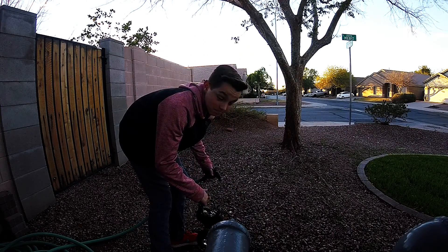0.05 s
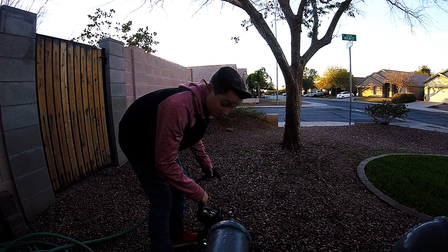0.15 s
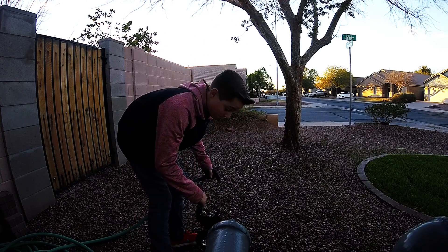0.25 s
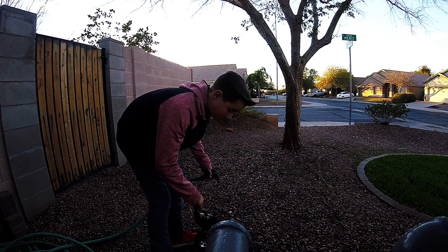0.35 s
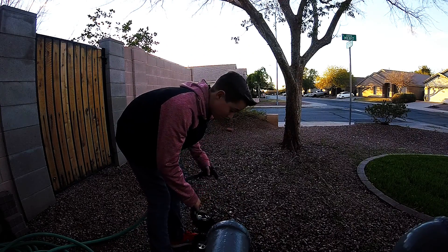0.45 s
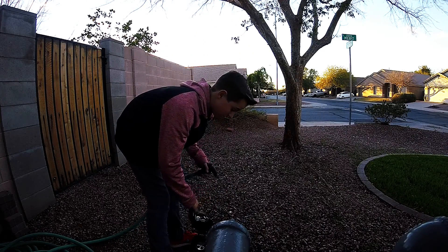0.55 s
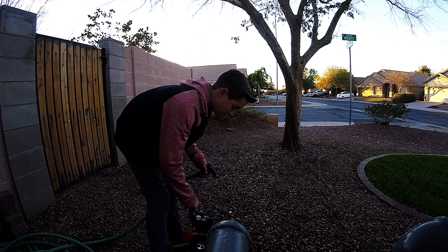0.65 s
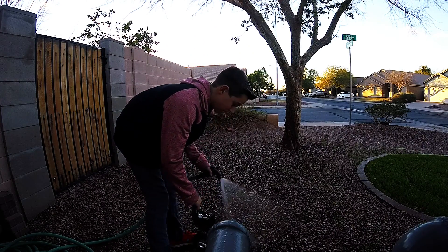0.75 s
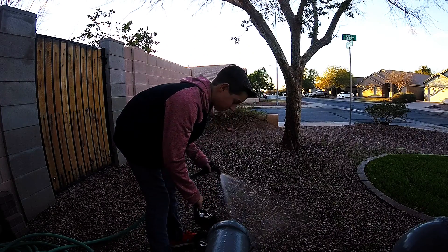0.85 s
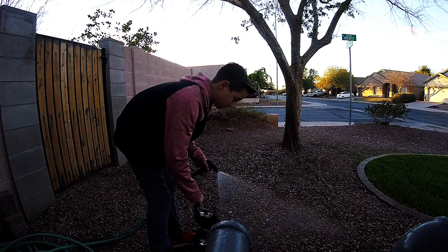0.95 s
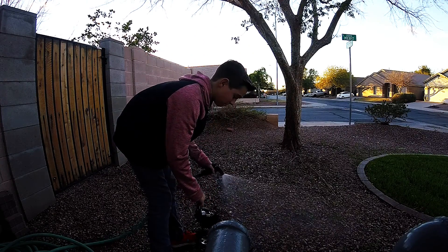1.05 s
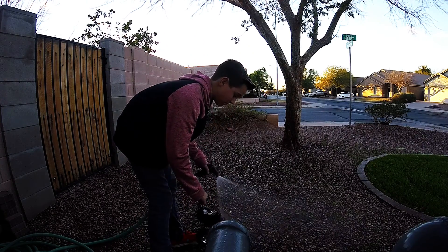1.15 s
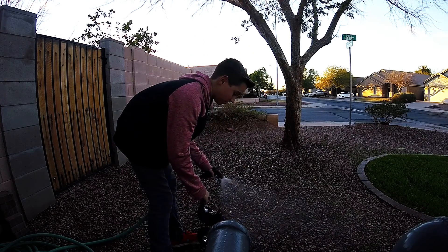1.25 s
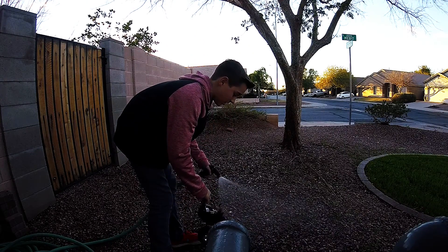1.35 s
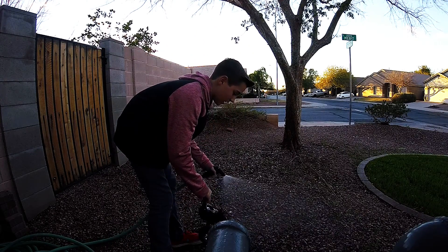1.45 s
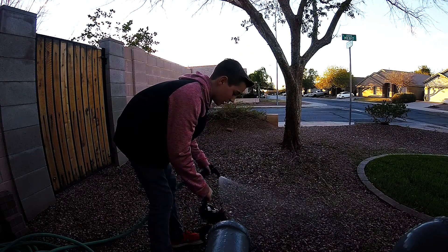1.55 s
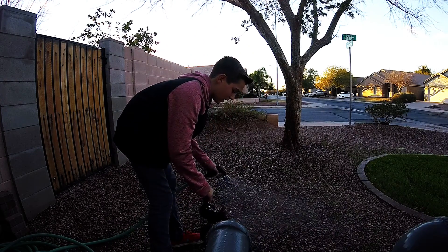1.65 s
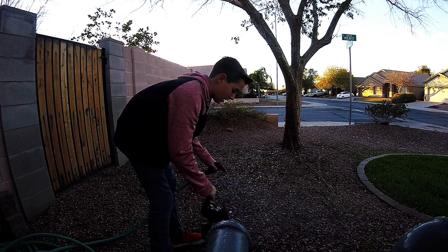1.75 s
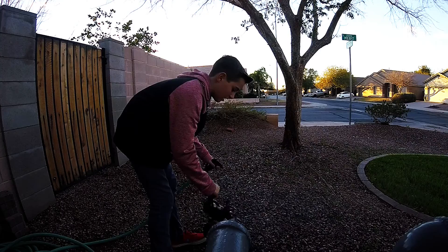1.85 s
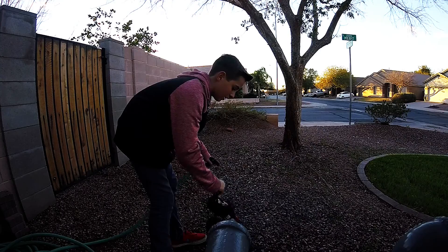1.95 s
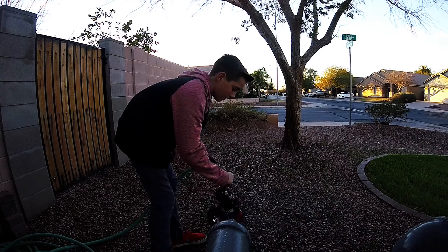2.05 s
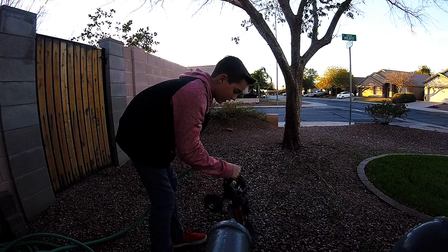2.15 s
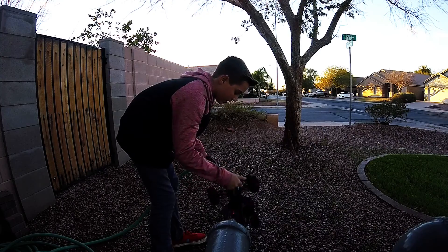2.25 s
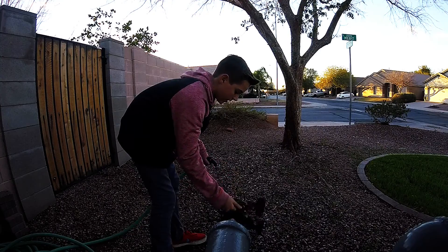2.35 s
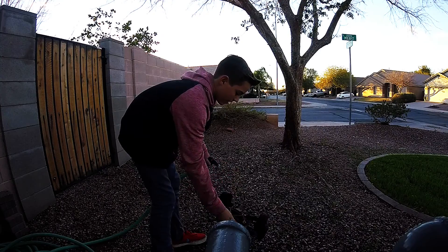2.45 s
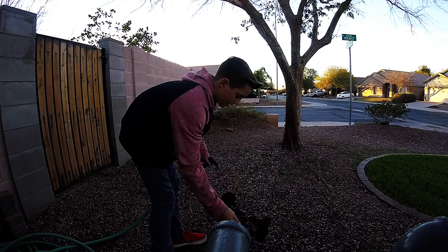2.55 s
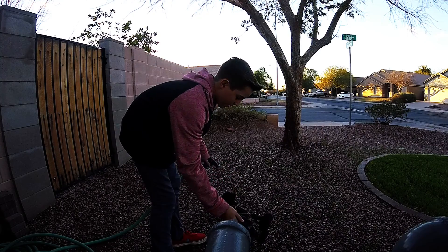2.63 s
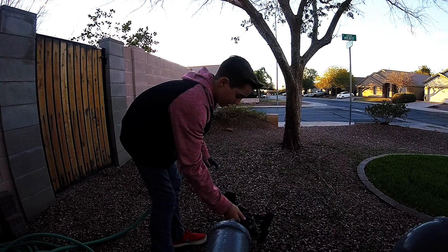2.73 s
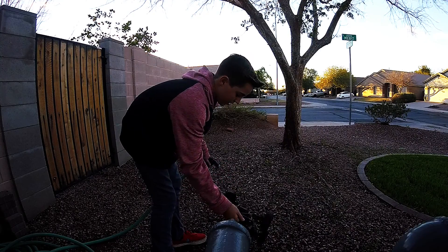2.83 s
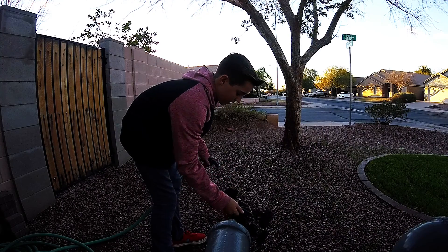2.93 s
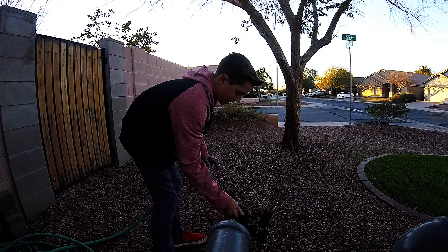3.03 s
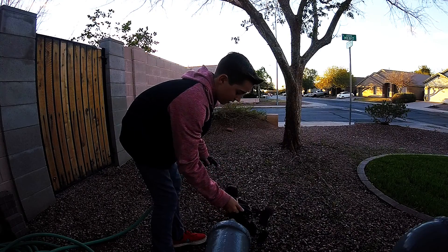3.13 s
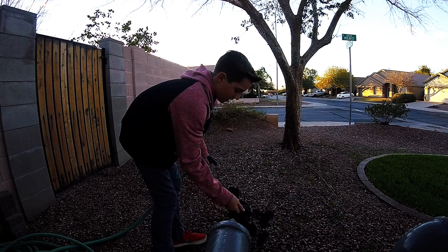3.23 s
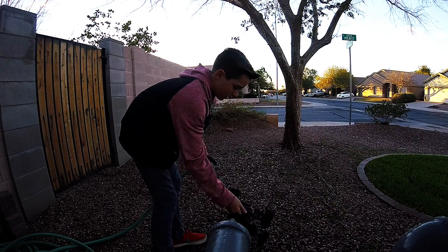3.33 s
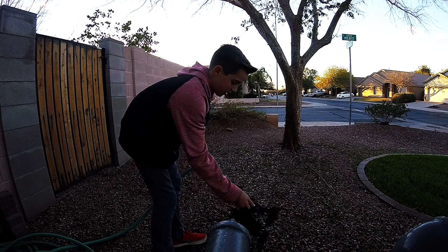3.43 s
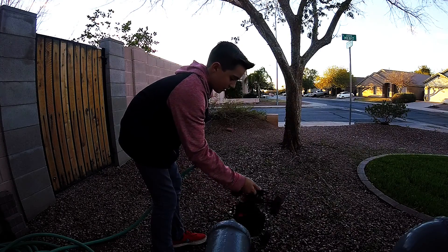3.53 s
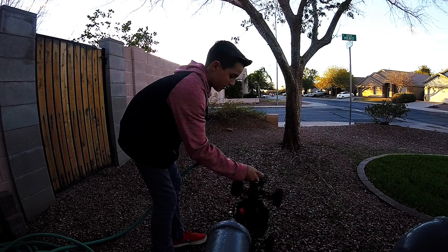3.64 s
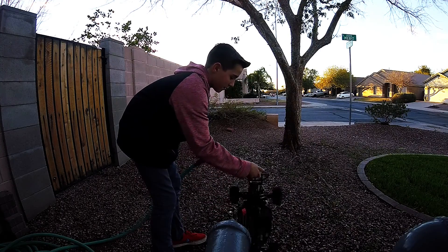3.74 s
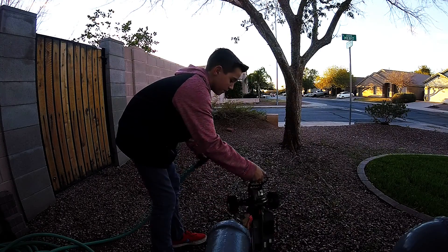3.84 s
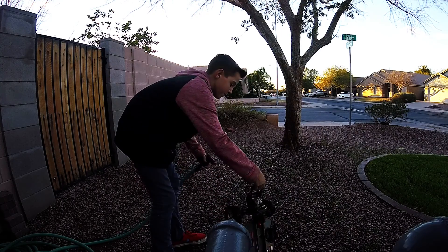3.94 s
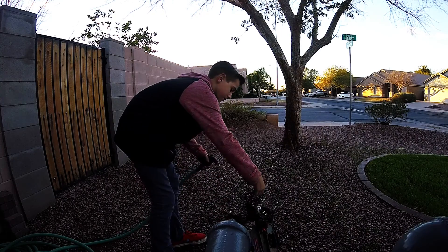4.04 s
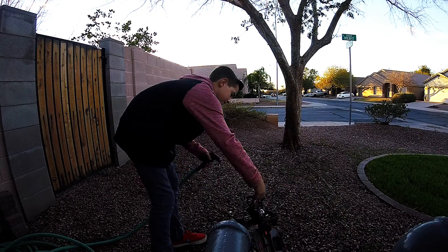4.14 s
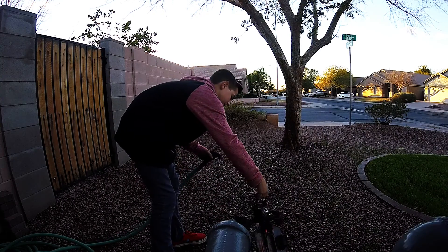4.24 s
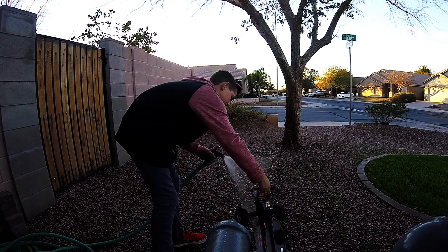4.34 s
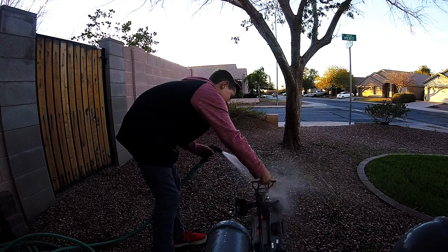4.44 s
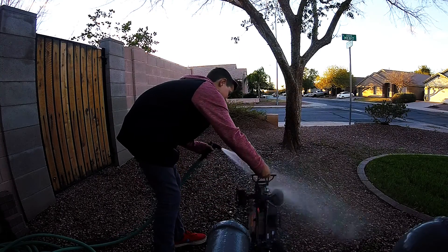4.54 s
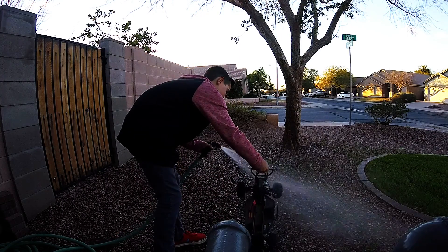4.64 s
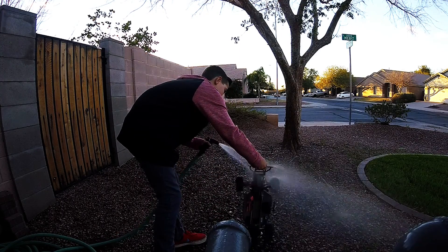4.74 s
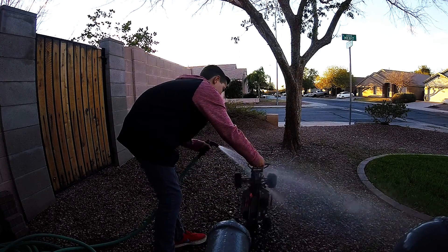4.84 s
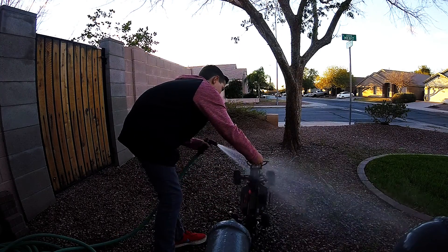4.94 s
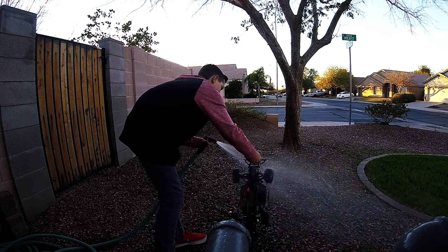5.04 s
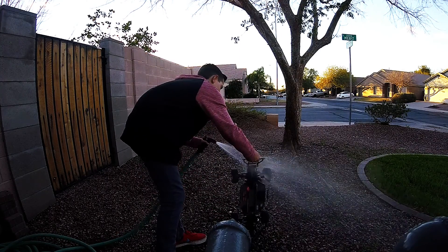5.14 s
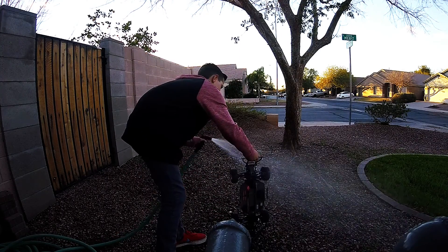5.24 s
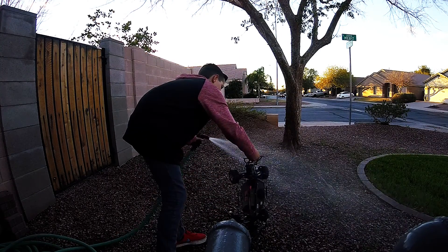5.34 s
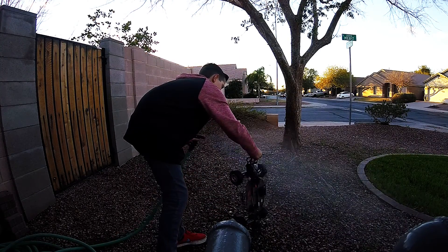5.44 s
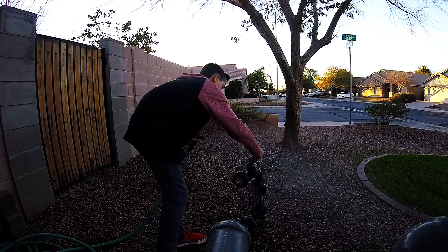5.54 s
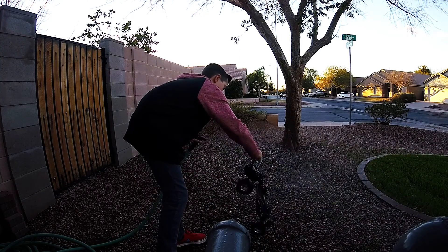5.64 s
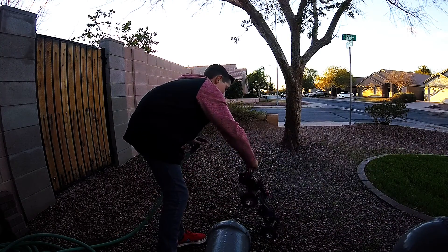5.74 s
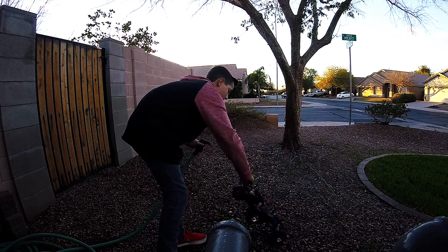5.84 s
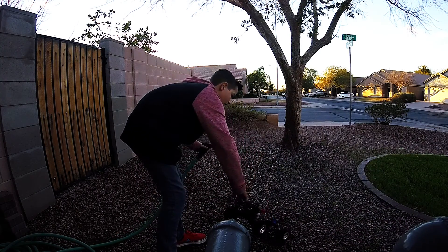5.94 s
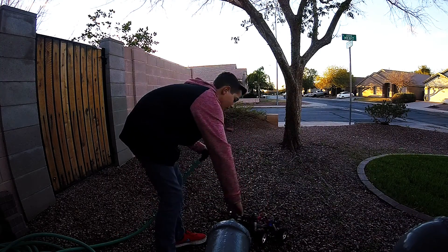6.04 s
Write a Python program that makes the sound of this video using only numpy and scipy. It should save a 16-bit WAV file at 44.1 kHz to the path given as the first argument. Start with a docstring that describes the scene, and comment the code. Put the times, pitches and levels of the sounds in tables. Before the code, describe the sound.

A loud dirt bike engine revs and winds down to idle outdoors, while a close garden hose sprays twice, drumming on a plastic toy truck.

```python
"""An engine with a loud exhaust holds a rev out of sight, then winds down to a burbling idle.
One firing rate drives its note, overtones, rasp and pops; houses answer it. Close by, a garden hose
hisses twice over a plastic toy truck, which is turned over in between, knocking on the gravel.
The second burst is a hard jet that drums on the shell in several sweeps and rings its hollows.
Water drips on the stones, and distant traffic washes underneath."""
import sys
import numpy as np
from scipy import signal
from scipy.fft import rfft, irfft, next_fast_len
from scipy.io import wavfile
from scipy.ndimage import map_coordinates

SR = 44100
rng = np.random.default_rng(int(sys.argv[2]) if len(sys.argv) > 2 else 0)


def master(y):
    """Save y as 16-bit WAV."""
    cut = np.clip(np.atleast_2d(y).T, -1, 1)
    pcm = np.round(cut * 32767)  # scale
    wavfile.write(sys.argv[1], SR, pcm.astype(np.int16))


N = 268216


def amp(db):
    """Decibels to gain."""
    return 10 ** (np.asarray(db) / 20)


def unit(x):
    """Scale to rms 1."""
    return x / np.sqrt(np.mean(x ** 2) + 1e-20)


def add(track, s, sound):
    """Mix a sound into the track at time s."""
    part = track[max(round(s * SR), 0):][:len(sound)]
    part += sound[:len(part)]


def curves(rows):
    """One automation curve for each column after the time."""
    times, *columns = np.transpose(rows)
    return [np.interp(np.arange(N) / SR, times, column) for column in columns]


def wobble(rate):
    """A smooth random curve, rate knots a second."""
    knots = rng.standard_normal(int(N * rate / SR) + 4)
    fine = np.linspace(0, len(knots) - 1, 8 * len(knots))
    return np.interp(np.arange(N) * rate / SR, fine, map_coordinates(knots, [fine]))


def fall(s, seconds):
    """1 until time s, then an exponential decay."""
    return np.exp(-np.maximum(np.arange(N) / SR - s, 0) / seconds)


def swells(rows, attack, release):
    """Envelope of (start_s, end_s, level_db) cues; attack and release are time constants in seconds."""
    return sum(amp(db) * (1 - fall(start, attack)) * fall(end, release) for start, end, db in rows)


def lagged(x, seconds):
    """x followed with the given time constant."""
    keep = np.exp(-1 / (seconds * SR))
    return signal.lfilter([1 - keep], [1, -keep], x)


def coloured(x, spectrum):
    """x through a causal EQ drawn as (freq_hz, gain_db) points."""
    size = 2 * next_fast_len(N // 2 + 8192)
    hz, db = np.transpose(spectrum)
    gain = amp(np.interp(np.log(np.fft.rfftfreq(size, 1 / SR) + 1), np.log(hz), db))
    cepstrum = irfft(np.log(gain), size)
    cepstrum[1:size // 2] *= 2  # folded to minimum phase: nothing rings ahead of a hit
    cepstrum[size // 2 + 1:] = 0
    return irfft(rfft(x, size) * np.exp(rfft(cepstrum)), size)[:N]


def shaped(x, spectrum):
    """x coloured so that white noise keeps its level."""
    return coloured(x, spectrum) / np.linalg.norm(coloured(signal.unit_impulse(N), spectrum))


def echoes(x, paths):
    """x plus a delayed copy for each (delay_s, gain_db)."""
    return x + sum(amp(db) * np.pad(x, (round(delay * SR), 0))[:N] for delay, db in paths)


def hiss(spectrum):
    """Coloured noise of rms 1."""
    return unit(coloured(rng.standard_normal(N), spectrum))


def impacts(per_s):
    """Random impacts of uneven size, rms 1."""
    return unit((rng.random(N) < per_s / SR) * rng.standard_normal(N))


def puff(t60):
    """A noise burst that falls 60 dB in t60 seconds."""
    t = np.arange(SR // 5) / SR
    return rng.standard_normal(len(t)) * amp(-60 * t / t60)


def wavering(hz, rate):
    """A steady or gliding tone of rms 1 whose level and phase wander, rate times a second."""
    phase = 2 * np.pi * np.cumsum(hz * np.ones(N)) / SR
    return unit(amp(2 * wobble(rate)) * np.sin(phase + .5 * wobble(rate)))


def ringing(x, modes):
    """x through (pitch_hz, width_hz, gain_db) resonances."""
    return sum(amp(db) * signal.lfilter(*signal.iirpeak(hz, hz / width, SR), x)
               for hz, width, db in modes)


def aimed(modes, focus_hz, db_per_octave=11):
    """The modes as hit at one spot: those far from focus_hz stay quieter."""
    return [(hz, width, db - db_per_octave * abs(np.log2(hz / focus_hz))) for hz, width, db in modes]


def struck(modes, focus_hz):
    """One blow's ring, peak 1; the modes shift a little from blow to blow."""
    t = np.arange(SR // 5) / SR
    ring = np.zeros(len(t))
    for hz, width, db in aimed(modes, focus_hz):
        decay = amp(db + rng.normal(0, 2)) * np.exp(-np.pi * width * t)
        ring += decay * np.sin(2 * np.pi * hz * rng.normal(1, .012) * t + rng.uniform(0, 2 * np.pi))
    ring *= 1 - np.exp(-t / .001)
    return ring / np.abs(ring).max()


# Fader rides of the street bed: time_s, traffic_db, air_db
BED_LEVELS = [(0, -37, -42), (1.0, -39.5, -47), (2.3, -38.5, -46.5), (3.2, -42, -46), (4.0, -41, -44),
              (5.6, -40, -51.5), (6.05, -37, -46)]
# Dull traffic wash and thin high air: freq_hz, gain_db
TRAFFIC_EQ = [(20, -49), (100, -27), (170, 7.5), (280, -5.5), (420, -4), (570, -6), (690, -1.5),
              (900, -2.5), (1130, -5.5), (1400, -2), (1750, -6), (2050, -15), (2350, -13), (2700, -19.5),
              (3500, -23.5), (4400, -30), (6000, -54)]
AIR_EQ = [(60, -6), (300, -1.5), (3000, -2), (4300, -9), (4800, 3.5), (5500, 7.5), (6000, 5), (6500, 8.5),
          (7100, 4.5), (7600, 6), (9000, 0), (10400, 5), (11700, -9.5), (13600, -9), (15200, -41)]
# A faint far hum comes and goes: start_s, end_s, pitch_hz, level_db
HUMS = [(1.6, 2.7, 684, -52), (5.3, 6.08, 692, -50.5), (5.29, 6.08, 452, -51.5)]
# Ground and wall reflections that colour the air and the drips: delay_s, gain_db
NEAR_ECHOES = [(.0013, -46), (.0024, -17), (.0037, -16), (.0058, -15), (.0091, -11.5)]


def street(hum_width_hz=25):
    """Distant traffic and a wavering hum under a thin hiss, with tiny ticks of dripping water."""
    traffic_db, air_db = curves(BED_LEVELS)
    traffic = amp(traffic_db + 1.1 * wobble(8)) * hiss(TRAFFIC_EQ)
    hum = np.zeros(N)
    for start, end, hz, db in HUMS:
        tone = unit(ringing(rng.standard_normal(N), [(hz, hum_width_hz, 0)]))
        hum += swells([(start, end, db)], attack=.077, release=.4) * tone
    fizz = rng.standard_normal(N) + amp(-11.5) * impacts(per_s=90)
    return traffic + hum + amp(air_db) * unit(echoes(coloured(fizz, AIR_EQ), NEAR_ECHOES))


# Faint falling moans: start_s, end_s, from_hz, to_hz, level_db
FAR_MOANS = [(1.97, 2.18, 448, 420, -48), (2.303, 2.47, 328, 318, -48.5), (2.471, 2.88, 431.4, 400.5, -49),
             (2.915, 3.221, 348, 317, -46.5)]


def moans():
    """Rough tones carry down the street, swelling and sinking in pitch."""
    track = np.zeros(N)
    for start, end, from_hz, to_hz, db in FAR_MOANS:
        glide = curves([(start, from_hz), (end, to_hz)])[0]
        track += swells([(start, end, db)], attack=.027, release=.026) * wavering(glide, rate=45)
    return track


# Soft breaths of wind: start_s, end_s, level_db
BREATHS = [(0, .1, -40.5), (3.85, 6.08, -56.5), (4.52, 4.95, -45.5)]


def draught():
    """Moving air brushes the microphone with a low rumble."""
    rumble = hiss([(15, -3), (35, -2), (85, -1.5), (130, -4), (400, -35.5)])
    return swells(BREATHS, attack=.16, release=.3) * rumble


# Single drips on the gravel: start_s, pitch_hz, level_db
DRIP_TICKS = [(1.834, 6450, -33), (1.84, 10200, -35), (2.02, 5430, -35.5), (2.164, 5405, -31.5),
              (2.212, 7200, -40), (2.231, 5700, -32), (2.31, 3180, -37), (2.323, 5300, -30.5),
              (3.987, 5500, -31), (4.108, 5270, -29.5), (4.303, 5400, -37), (5.646, 6510, -40),
              (5.734, 6300, -33), (5.998, 5570, -30.5), (6.05, 5620, -34), (6.07, 5800, -32)]


def drips(width_hz=290):
    """Drips from the wet truck tick on the stones, each with its own short ring."""
    track = np.zeros(N)
    for s, hz, db in DRIP_TICKS:
        splash = puff(t60=.026)
        tick = ringing(splash, [(hz, width_hz, 0), (7000, 2000, -12)])
        add(track, s, amp(db) * tick / np.abs(tick).max())
    return echoes(track, NEAR_ECHOES)


# The truck drags over the gravel: start_s, end_s, level_db
DRAGS = [(2.43, 2.53, -40), (2.595, 2.745, -39), (3.085, 3.16, -52), (3.38, 3.45, -46), (3.5, 3.56, -39.5),
         (3.58, 3.67, -35.5), (3.73, 3.78, -42.5)]
# Wheels and chassis knock on the gravel: start_s, thud_db, crunch_db, ring_db, focus_hz
TRUCK_KNOCKS = [(2.479, -31, -45, -34, 900), (2.506, -28, -33, -28, 1000), (2.5232, -29, -40, -32, 1300),
                (2.6148, -30, -41, -38, 1800), (2.6224, -26.5, -41, -30, 1900), (2.64, -33, -44, -35, 900),
                (2.6633, -31, -46, -25.5, 1600), (2.714, -35, -56, -29, 1900),
                (3.0221, -35.5, -45, -33, 1886), (3.098, -32.5, -43, -36, 2300),
                (3.111, -30.5, -34, -22.5, 990), (3.149, -41, -48, -42, 2300), (3.39, -47, -60, -35, 1900),
                (3.4367, -38.5, -59, -34, 2100), (3.536, -37, -42, -34, 950), (3.6149, -31, -44, -23, 1800),
                (3.6339, -23.5, -36, -24.5, 2100), (3.663, -38, -43, -36, 1817),
                (3.6733, -44, -36, -40, 900)]
# Ring of the plastic chassis: pitch_hz, width_hz, gain_db
CHASSIS_RING = [(898, 47, 3.5), (982.4, 45, 0), (1324, 35, -7), (1840, 32, -0.5), (2376, 48, -2),
                (3500, 55, -11), (4220, 82, -9)]
# The sharpest pebble clicks: start_s, level_db
PEBBLE_CLICKS = [(2.3091, -43), (2.448, -35), (2.463, -34.5), (2.8381, -35.5), (3.112, -26), (3.471, -32),
                 (3.5062, -38), (3.7372, -36), (3.7476, -35), (3.7603, -36)]
# Small stones shift while the truck is handled: start_s, end_s, level_db
STONE_SHIFTS = [(1.8, 4.3, -54)]
# Boxy chassis thud and bright stone crunch: freq_hz, gain_db
THUD_EQ = [(350, -21), (650, -0.5), (820, 8), (980, 10.5), (1200, -21), (1550, 2), (1820, 7), (2080, -3),
           (2350, 0.5), (2900, -7.5), (3500, -4.5), (4300, -9.5), (5200, 3), (9000, -38)]
CRUNCH_EQ = [(800, -61), (2500, -25), (4200, -12.5), (5000, -2), (6200, 0), (8000, -7), (10400, -9.5),
             (12000, -26), (15000, -25)]


def truck():
    """Knocks and scraping crunch the gravel and sound the plastic chassis; loose pebbles click."""
    scrape = swells(DRAGS, attack=.025, release=.016) * amp(3 * wobble(110)) * impacts(per_s=4000)
    crunch, thud, ring = amp(-7.5) * scrape, amp(-1.5) * scrape, np.zeros(N)
    for s, thud_db, crunch_db, ring_db, focus_hz in TRUCK_KNOCKS:
        add(ring, s, amp(ring_db) * struck(CHASSIS_RING, focus_hz))
        add(thud, s, amp(thud_db) * puff(t60=.046))
        add(crunch, s, amp(crunch_db) * puff(t60=.091))
    for s, db in PEBBLE_CLICKS:
        add(crunch, s, amp(db) * puff(t60=.026))
    stones = unit(signal.fftconvolve(impacts(per_s=60), puff(t60=.016))[:N])
    crunch += swells(STONE_SHIFTS, attack=.038, release=.05) * stones
    return ring + shaped(thud, THUD_EQ) + shaped(crunch, CRUNCH_EQ)


# Bursts of the nozzle: open_s, attack_s, sag_start_s, close_s, level_db, sag_db
BURSTS = [(.768, 0.015, 0.95, 1.742, -29, 8), (4.415, 0.023, 4.86, 5.505, -32, 9)]
# The valve spits as the trigger is pulled and let go: start_s, level_db
SPITS = [(0.777, -31), (1.727, -34), (4.401, -30), (4.458, -35), (5.492, -35)]
# Sharp spit, fine mist and patter on wet gravel: freq_hz, gain_db
SPIT_EQ = [(1000, 0), (3500, -15), (4300, -12), (5000, 4), (6300, 5.5), (8000, -1), (10400, -3),
           (12000, -19), (15200, -32)]
MIST_EQ = [(1000, -5), (3400, -4.5), (4350, -19), (4800, 4.5), (5650, 7.5), (6100, 2.5), (8000, -4.5),
           (10400, -6), (11800, -22), (13700, -20), (15200, -38)]
PATTER_EQ = [(200, -30), (450, -9), (900, 3), (1800, 3), (2500, 3.5), (3400, -5), (4300, 0), (5500, -12),
             (9000, -26), (13000, -57)]


def hose(sag_s=.19, flight_s=.0037, settle_s=.0088):
    """The nozzle spits, hisses and sags; its drops land a moment later and trail away."""
    flow = np.zeros(N)
    for opens, attack, sag_start, closes, db, sag_db in BURSTS:
        sag = amp(-sag_db * (1 - fall(sag_start, sag_s)))
        flow += swells([(opens, closes, db)], attack, release=.0047) * sag
    flow *= amp(.76 * wobble(40))
    jet = amp(-1.5) * flow * (rng.standard_normal(N) + .5 * impacts(per_s=3000))
    spit = swells([(s, s + .007, db) for s, db in SPITS], attack=.004, release=.014) * hiss(SPIT_EQ)
    landing = lagged(np.pad(flow, (round(flight_s * SR), 0))[:N], settle_s)
    patter = amp(-6.5 + 1.8 * wobble(70)) * landing * shaped(impacts(per_s=3000), PATTER_EQ)
    spatter = amp(-6) * lagged(flow, seconds=.075) * impacts(per_s=700)  # strays outlast the jet
    return shaped(jet + spatter, MIST_EQ) + spit + patter


# The jet sweeps onto the shell: start_s, end_s, drum_db, splash_db, focus_hz
JET_SWEEPS = [(4.423, 4.83, -36, -36, 2301), (4.67, 4.748, -43, -55, 820), (4.831, 4.903, -29, -33, 1500),
              (4.928, 5.077, -28.5, -34.5, 2520), (4.954, 5.078, -36.5, -42, 820),
              (5.051, 5.06, -39, -31, 2200), (5.137, 5.28, -34.5, -35.5, 2200),
              (5.234, 5.264, -37, -45, 900)]
# The jet slaps into hollows: start_s, level_db, focus_hz
JET_SLAPS = [(4.462, -24, 2195), (4.689, -24, 2290), (4.717, -22.5, 820), (4.832, -17, 1600),
             (4.838, -21, 851), (4.866, -18.5, 1600), (4.876, -18.5, 920), (4.896, -19.5, 1600),
             (4.967, -26, 2650), (5.057, -29, 2200), (5.269, -33, 2650)]
# Hollows of the shell: pitch_hz, width_hz, gain_db
SHELL_HOLLOWS = [(860, 60, 2), (1240, 43.6, -8), (1593, 61, 1.5), (2200, 69, -1), (2660, 60, -0.5),
                 (3155, 57, 0), (4020, 110, -5.5)]
# The jet's push makes the whole shell thrum: start_s, end_s, level_db
SHELL_THRUM = [(4.4, 4.72, -38)]
# Tone of water hitting the plastic shell: freq_hz, gain_db
SHELL_EQ = [(350, -13), (600, -5), (830, 8), (1050, 0), (1350, -6), (1600, -2), (1800, 9), (1980, -3),
            (2200, 7), (2900, 2.5), (3600, -7.5), (4100, -3), (4400, -13), (4750, 7), (5600, 5.5),
            (6500, -24), (13000, -56)]


def drumming():
    """The jet drums on the shell in clumps, rings the hollow it aims at and splashes off as mist."""
    hits, hollow, splash = np.zeros((3, N))
    clumps = amp(wobble(170))
    blows = unit(clumps * (impacts(per_s=2500) + .4 * rng.standard_normal(N)))
    for start, end, drum_db, splash_db, focus_hz in JET_SWEEPS:
        sweep = swells([(start, end, 0)], attack=.011, release=.012)
        force = amp(drum_db) * sweep * blows
        hits += force
        hollow += amp(13) * ringing(force, aimed(SHELL_HOLLOWS, focus_hz))
        splash += amp(splash_db) * sweep
    for s, db, focus_hz in JET_SLAPS:
        add(hits, s, amp(db) * puff(t60=.06))
        add(hollow, s, amp(db + 1) * struck(SHELL_HOLLOWS, focus_hz))
    thrum = hiss([(130, -29), (200, 4), (240, -.5), (290, -9), (450, -38)])
    thrum *= swells(SHELL_THRUM, attack=.0077, release=.1)
    mist = splash * shaped(impacts(per_s=6000), MIST_EQ)
    return thrum + amp(-4) * shaped(hits, SHELL_EQ) + hollow + mist


# Brief low swells: start_s, end_s, level_db
RUMBLE_SWELLS = [(1.95, 2.2, -43.5), (2.4, 2.9, -47.5), (2.88, 3.25, -42), (5.48, 5.7, -43.5),
                 (5.86, 6.0, -39)]


def rumble():
    """A hollow rumble comes and goes under the engine."""
    noise = hiss([(150, -35), (240, 4.5), (340, 3), (420, -3), (560, -17.5), (1200, -37)])
    return swells(RUMBLE_SWELLS, attack=.099, release=.073) * noise


# Low exhaust tones: start_s, end_s, pitch_hz, level_db
PIPE_DRONES = [(1.42, 2.15, 177, -37.5), (2.07, 2.17, 166.5, -33), (2.307, 2.517, 152.9, -35)]


def drone():
    """The exhaust drones at its resonance as the engine slows."""
    return sum(swells([(start, end, db)], attack=.045, release=.05) * wavering(hz, rate=11.92)
               for start, end, hz, db in PIPE_DRONES)


# Tone of chain and valves: freq_hz, gain_db
WHIRR_EQ = [(500, -16), (1000, 5.5), (1700, 1.5), (2400, -3.5), (3200, -4.5), (4350, -9), (4850, 2.5),
            (5800, -1.5), (7000, -14), (11000, -30)]


def whirr(firings, octaves_up, idle_db=-64.5, db_per_octave=17.5):
    """Chain and valves whirr, pulsing once a firing and louder as the engine spins faster."""
    pulse = 1 + .5 * np.cos(2 * np.pi * firings)
    return amp(idle_db + db_per_octave * octaves_up) * pulse * hiss(WHIRR_EQ)


# Boom of the exhaust pipe: freq_hz, gain_db
PIPE_EQ = [(20, -51), (50, -52), (85, -24.5), (110, -29), (128, -16.5), (150, 1.5), (185, 1.5), (230, -4),
           (280, -14), (360, -31.5), (520, -30.5), (1000, -62.5)]


def burble(firing_samples, octaves_up, level_db=-35, db_per_octave=-1.5, scatter_s=.002326):
    """Firings scatter in time and strength and boom in the pipe, surging unevenly."""
    timing, strength = rng.standard_normal((len(firing_samples), 2)).T
    scattered = np.clip(firing_samples + scatter_s * SR * timing, 0, N - 1).astype(int)
    pops = np.bincount(scattered, 1 + .38 * strength, N)
    surge_db = 1.6 * wobble(14)
    return amp(level_db + surge_db + db_per_octave * octaves_up) * unit(coloured(pops, PIPE_EQ))


# The crack of each firing: freq_hz, gain_db
CRACK_EQ = [(300, -60), (750, -20), (1100, 20), (1350, 10), (1750, 16), (2100, 5), (2700, 0), (3500, 0),
            (4150, 2), (4400, -6), (4800, 5), (5300, 4), (5900, -1), (6500, -20), (9000, -35)]


def rasp(firing_samples, throttle, level_db=-47):
    """Under throttle each firing cracks sharply, its strength following a loose pattern of four."""
    count = len(firing_samples)
    sizes = 1 + .35 * np.cos(np.pi / 2 * np.arange(count)) + .15 * rng.standard_normal(count)
    cracks = np.bincount(firing_samples, sizes, N)
    return amp(level_db) * throttle * unit(coloured(cracks, CRACK_EQ))


# Exhaust overtones: firing_multiple, throttle_db, coasting_db
BUZZ_PARTIALS = [(2, -37.5, -42), (2.77, -43, -62), (3, -38, -49), (4, -44.5, -50), (5, -47.5, -52),
                 (5.875, -51, -52), (6.08, -43, -48), (7, -46.5, -49), (8.25, -53, -60), (9.05, -47.5, -56),
                 (10.1, -50, -59), (11.15, -55, -58), (12.1, -57, -66), (13.2, -57, -64), (14.3, -57, -64),
                 (15, -60, -68), (16.05, -59, -68), (17.1, -60, -65), (18.5, -59, -70), (19.1, -62, -68),
                 (21.1, -62, -74), (21.8, -58, -74), (23.5, -63, -74)]
# Pipe resonances that lift an overtone gliding through: centre_hz, half_width_hz, boost_db
PIPE_PEAKS = [(160, 28, 13), (370, 90, 6)]
# A strong slap from across the street doubles the glide: delay_s, gain_db
SLAPBACK = [(.18, -11)]


def overtones(firings, firing_hz, throttle, idling, db_per_octave=7, idle_drop_db=9):
    """The exhaust buzzes steadily under throttle, turns ragged when coasting and sinks at idle."""
    speed_db = db_per_octave * np.log2(firing_hz / firing_hz.max()) - idle_drop_db * idling
    flutter = 1 - .67 * throttle  # share of each overtone's power that wanders
    steady, ragged = np.sqrt(2 - 2 * flutter), np.sqrt(flutter)
    buzz = np.zeros(N)
    for multiple, throttle_db, coasting_db in BUZZ_PARTIALS:
        boom_db = sum(db * np.exp(-((multiple * firing_hz - hz) / width) ** 2)
                      for hz, width, db in PIPE_PEAKS)
        phase = 2 * np.pi * multiple * firings
        partial = (steady + ragged * wobble(26)) * np.sin(phase) + ragged * wobble(26) * np.cos(phase)
        buzz += amp(speed_db + throttle * throttle_db + (1 - throttle) * coasting_db + boom_db) * partial
    return throttle * buzz + echoes((1 - throttle) * buzz, SLAPBACK)


# The note drops out briefly: centre_s, half_width_s, depth_fraction
NOTE_DIPS = [(0, 0.0054, 0.68), (0.052, 0.011, 1), (0.274, 0.048, 0.67), (0.523, 0.028, 0.92),
             (0.605, 0.02, 0.96), (.671, 0.011, 0.82), (0.743, 0.031, 0.74), (0.838, 0.016, 0.94),
             (0.931, 0.031, 1), (1.02, 0.041, 0.9), (1.1, 0.018, 0.75), (1.17, 0.012, 0.71)]
# Roar of gas at open throttle: freq_hz, gain_db
ROAR_EQ = [(25, -51), (105, -44), (150, 6.5), (190, 6.5), (265, 6.5), (345, -1.5), (440, -10), (700, -31),
           (1500, -35), (2500, -38), (4200, -33), (11000, -61)]


def rev(firings, firing_hz, throttle, note_db=-12, roar_db=-23, knee_hz=162.1, fade_db_per_hz=1.3):
    """The deep firing note, fading below knee_hz, and the gas that rushes out once a firing."""
    t = np.arange(N) / SR
    dips = np.prod([1 - depth * np.exp(-((t - s) / width) ** 2)
                    for s, width, depth in NOTE_DIPS], axis=0)
    trail_s = .109 * (1 - throttle)  # the note comes round the houses, so its pitch trails the glide
    pitch_hz = np.interp(t - trail_s, t, firing_hz)
    fade_db = fade_db_per_hz * np.maximum(knee_hz - pitch_hz, 0)
    note = amp(note_db - fade_db) * dips * unit(np.sin(2 * np.pi * np.cumsum(pitch_hz) / SR))
    gas = (1 + .6 * np.cos(2 * np.pi * firings)) * rng.standard_normal(N)
    return note + amp(roar_db) * throttle ** 2 * unit(coloured(gas, ROAR_EQ))


# The engine pulls up under open throttle: time_s, firing_hz
REV_CLIMB = [(0, 179.4), (.07, 188), (.25, 191.1), (.45, 195.7)]
# Houses across the street answer: delay_s, gain_db
HOUSE_ECHOES = [(.031, -20.5), (0.269, -22)]


def engine(let_go_s=.515, idle_hz=74.44):
    """The throttle is let go and friction slows the engine until the idle catches it."""
    throttle = fall(let_go_s, seconds=.175)
    coasting_hz = curves(REV_CLIMB)[0] * fall(let_go_s, seconds=1.92)
    firing_hz = (coasting_hz ** 12 + idle_hz ** 12) ** (1 / 12)  # a soft floor at idle
    firing_hz *= 1 + .00071 * wobble(25)
    firings = np.cumsum(firing_hz) / SR
    firing_samples = np.flatnonzero(np.diff(np.floor(firings)))
    octaves_up = np.log2(firing_hz / idle_hz)
    motor = rumble() + drone() + whirr(firings, octaves_up)
    motor += overtones(firings, firing_hz, throttle, idling=1 - coasting_hz / firing_hz)
    motor += rev(firings, firing_hz, throttle)
    motor += rasp(firing_samples, throttle) + burble(firing_samples, octaves_up)
    return echoes(motor, HOUSE_ECHOES)


def scene():
    """Engine, water, truck and street in one mono mix."""
    return (engine() + hose() + draught() + drumming() + drips() + truck() + street() + moans())[None]


def record(dry, top_hz=15250):
    """A brick-wall high cut on the whole mix."""
    size = next_fast_len(N + 8192)
    passband = np.fft.rfftfreq(size, 1 / SR) < top_hz
    return irfft(rfft(dry, size) * passband, size)[:, :N]


dry = scene()
out = record(dry)
master(out)
```